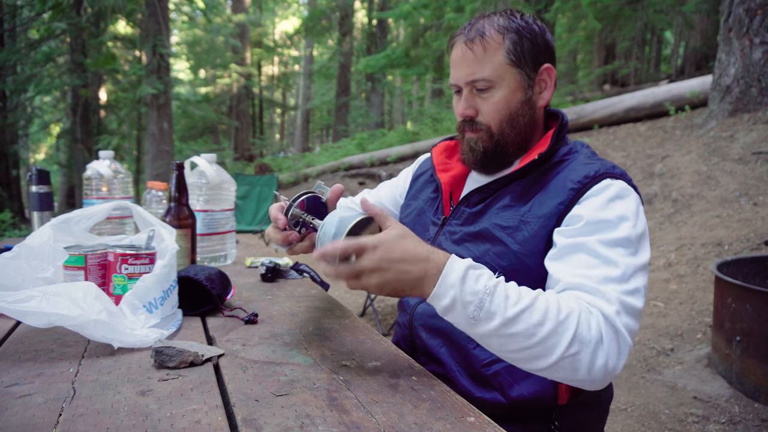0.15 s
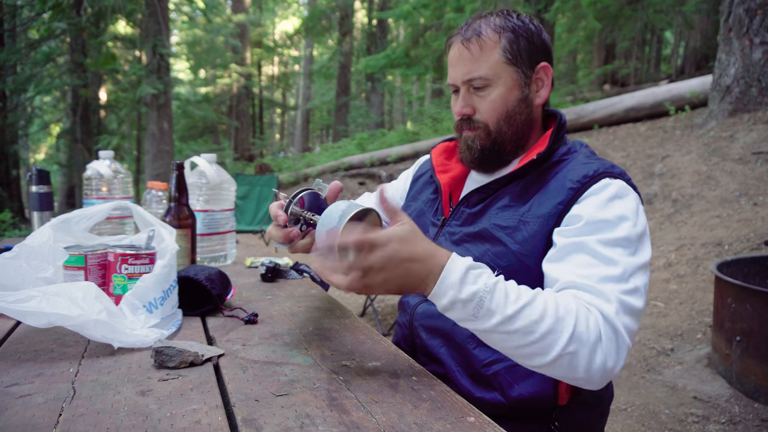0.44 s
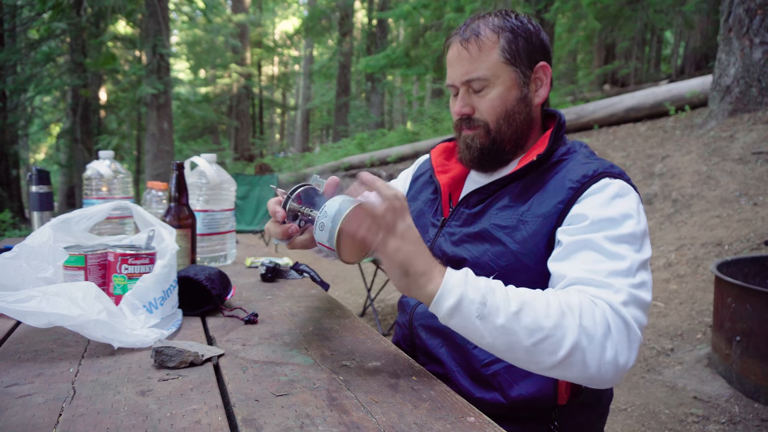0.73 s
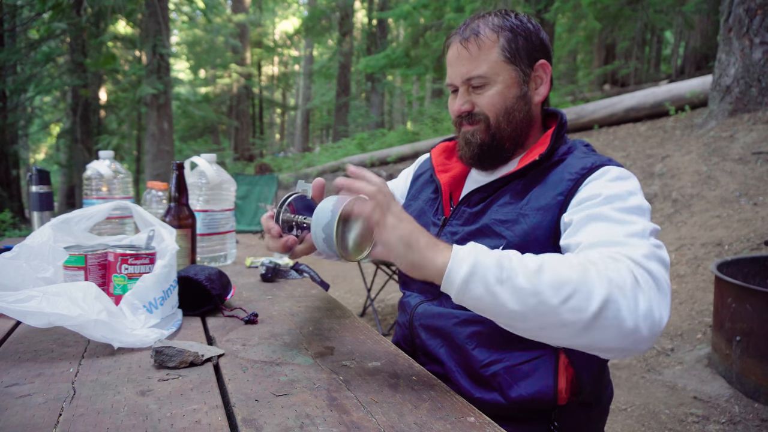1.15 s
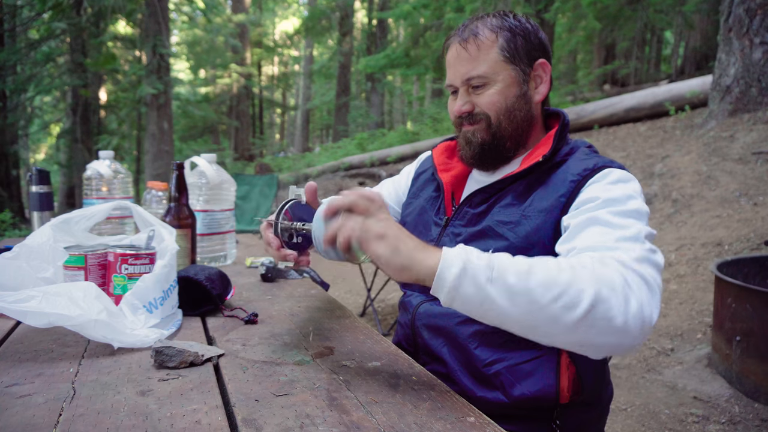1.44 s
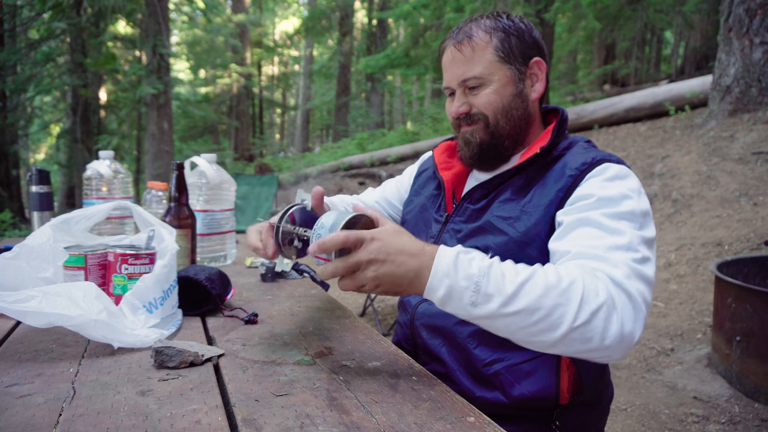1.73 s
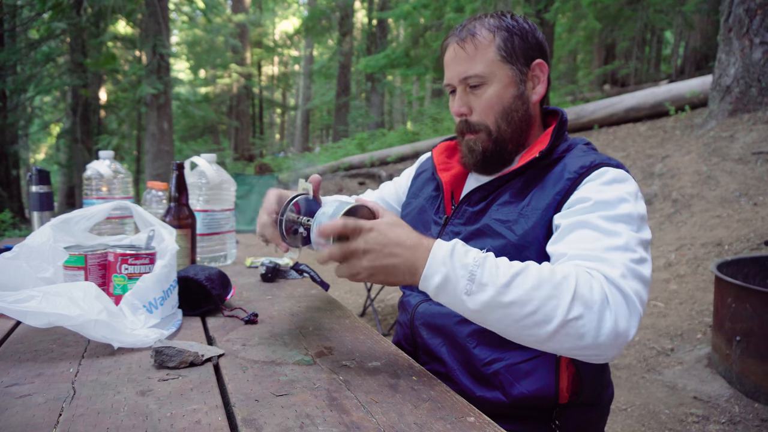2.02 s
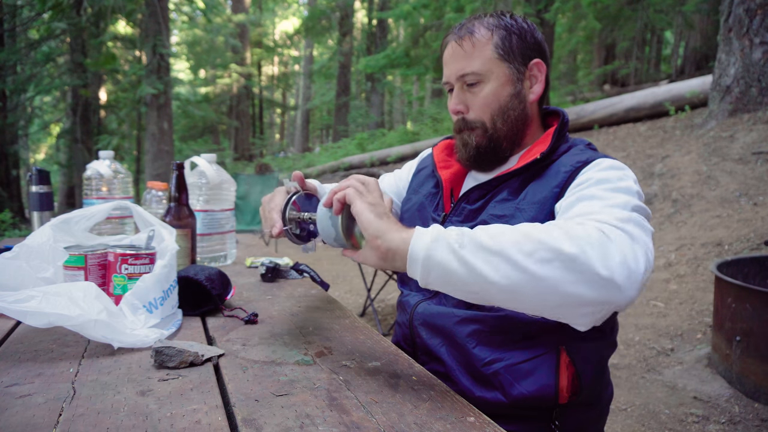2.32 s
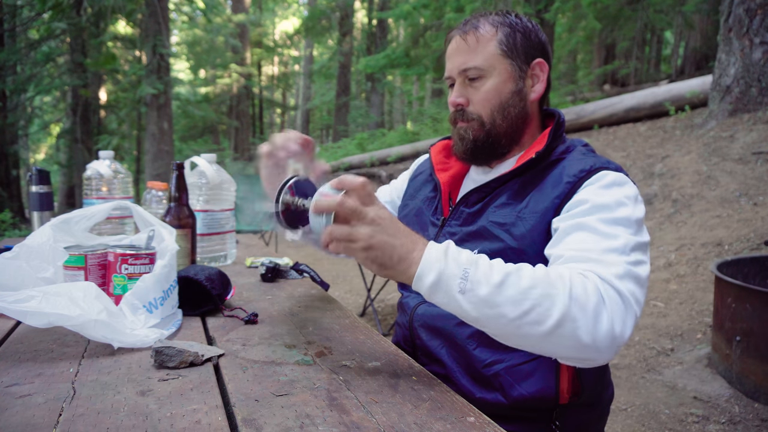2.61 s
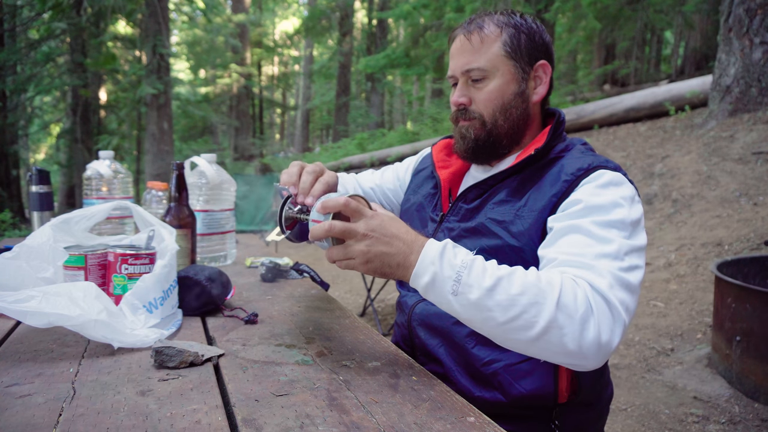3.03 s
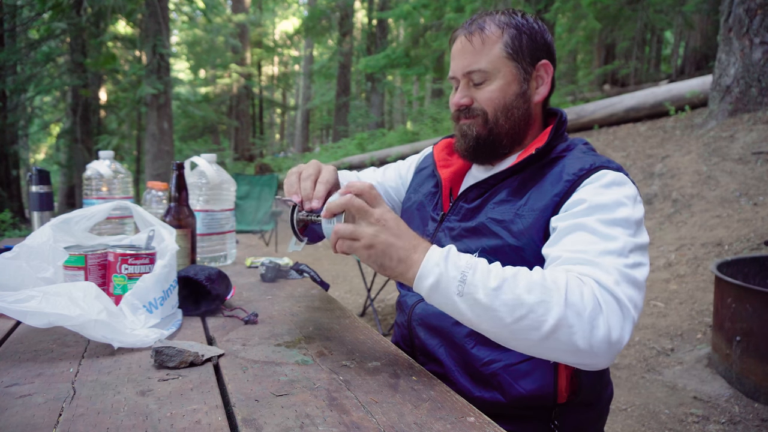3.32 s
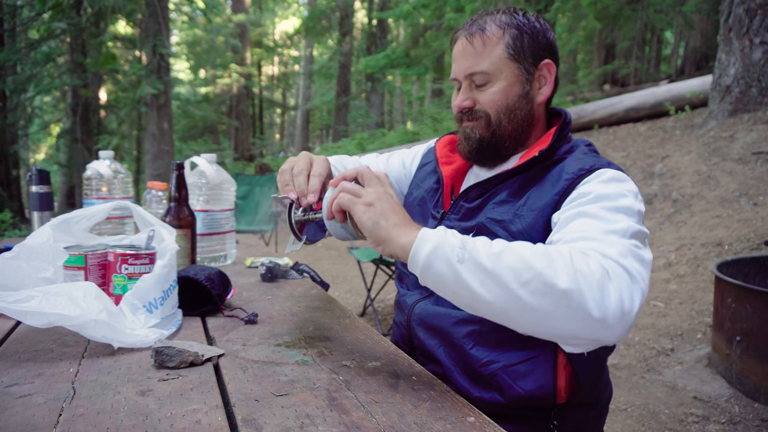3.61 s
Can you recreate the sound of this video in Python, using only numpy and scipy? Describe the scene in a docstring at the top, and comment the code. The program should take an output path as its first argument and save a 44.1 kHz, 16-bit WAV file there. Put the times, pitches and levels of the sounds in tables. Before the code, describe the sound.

Gas hiss from a camping stove canister, close and dry outdoors. At first near quiet: a soft dull knock at 0.04 s, faint ticks until 0.16, a thin high whistle and tiny puffs. At about 0.73 s a loud, bright, rough hiss bursts out, its breathy edge sagging and rising until 1.5. It sputters with shifting hollow colours, thins from 3.15, and catches again at 3.6. Faint distant low rumble underneath.

```python
"""Camping stove at a forest table

A gas canister is screwed onto the stove close by: a knock, ticks, a thin whistle and small puffs come first.
Then the valve opens and noise rushes out in four bands with a rough edge tone, sputtering, coloured by
moving resonances, hollows and close reflections. The jet thins near the end and catches again.
Noise shaped to a distant low rumble, with a wavering hum and faint air, lies underneath in both channels.
"""
import sys
import numpy as np
from scipy import signal
from scipy.fft import rfft, irfft
from scipy.io import wavfile
from scipy.ndimage import uniform_filter1d, map_coordinates

SR = 44100
rng = np.random.default_rng(int(sys.argv[2]) if len(sys.argv) > 2 else 0)


def to_wav(s):
    """Save 16-bit WAV."""
    ch = np.atleast_2d(s).T  # columns
    pcm = np.round(np.clip(ch, -1, 1) * 32767)  # PCM
    wavfile.write(sys.argv[1], SR, pcm.astype(np.int16))


N = 165375
T = np.arange(N) / SR  # seconds
HZ = np.maximum(np.arange(N // 2 + 1) * SR / N, 1)  # frequency axis, kept above zero for logarithms
CUTOFF_HZ = 15800

# Base level of the rushing gas in four bands.
# Each row: time in seconds, then low, middle, high and top band in dB.
HISS_LEVELS = [(0.7, -85, -81, -70, -71), (0.73, -50, -42, -45.5, -37), (0.785, -42, -38, -36, -28),
               (0.8, -37, -33.5, -28, -26), (0.83, -32.5, -33, -25.5, -29.5), (0.97, -34, -35.5, -29, -23),
               (1.04, -27.5, -30.5, -22, -32), (1.06, -26, -30.5, -24, -30.5),
               (1.15, -26.5, -34, -29.5, -36.5), (1.17, -27, -31, -28, -35), (1.37, -29, -31, -24, -30),
               (1.43, -31.5, -29, -25.5, -33), (1.68, -33.5, -31.5, -26, -34.5),
               (2.1, -31, -28.5, -25.5, -35), (2.19, -32.5, -28, -26, -37.5),
               (2.78, -31.5, -24.5, -25, -33), (2.81, -28, -24.5, -24, -36), (2.86, -33, -24.5, -27, -34),
               (3.1, -31.5, -26, -27.5, -33), (3.16, -38, -26, -29, -35.5),
               (3.24, -40.5, -31, -31.5, -36.5), (3.35, -42.5, -34, -32.5, -36.5),
               (3.39, -46.5, -39.5, -35.5, -36), (3.46, -47.5, -41, -37, -34), (3.59, -47, -38.5, -35, -33),
               (3.6, -41, -29.5, -29, -37.5), (3.73, -41, -30.5, -31, -37.5), (3.75, -40, -36, -33, -35)]
# Borders between those bands in Hz, and a constant trim for each band in dB.
BAND_EDGES_HZ = [3500, 5500, 10500]
BAND_TRIM_DB = [0.028, -0.53, -1.3, -0.12]
FLUTTER_DB, FLUTTER_HZ = 0.21, 98  # spread and speed, drawn separately for each band

# Smooth colour of the jet. Each row: frequency in Hz, gain in dB.
JET_COLOUR = [(50, -58), (200, -17.5), (350, -18.5), (600, -24), (1100, -20.5), (1450, -8.5), (2400, -2.5),
              (3500, -4), (5000, -5), (7500, 1.9), (10000, -1.5), (12000, -0.9), (15800, 0.7)]
SPUTTER_DB, SPUTTER_HZ = 0.6, 37
# Droplets of liquid gas burst in the jet: mean rate, swell at strength 1, time from start to peak.
SPITS_PER_S, SPIT_DB, SPIT_RISE_S = 75, -9, 0.00058

# Place of the stove in the stereo picture. Each row: frequency in Hz, left minus right in dB.
PAN = [(900, -0.5), (1200, 4), (1500, 0.5), (2800, -0.8), (4300, 3), (5400, 5), (7000, 2.5), (10000, 2),
       (15000, -1.5)]
RIGHT_LAG_S = 0.000008
# Part of the hiss unrelated between the channels. Each row: frequency in Hz, level against the shared part in dB.
SCATTER = [(250, -26), (900, -19.5), (1150, -4), (1550, -15.5), (2700, -16.5), (3500, -4.5), (4500, -9),
           (5700, -2.5), (7300, -9), (14000, -7)]

# Resonances and hollows of the burner. Each row: frequency in Hz, width in Hz, mean gain in dB.
BURNER = [(924, 103, 7), (2114, 310, 2.5), (2810, 47, -0.4), (3500, 310, -5), (5030, 186, 1.2),
          (6100, 370, -1.5), (6330, 240, 3.5), (7030, 180, 4.0), (7780, 940, 3.5), (9860, 350, 4.5),
          (11090, 210, 4.5), (13000, 370, 2.5)]
SWELL_DB, SWELL_HZ = 1.5, 2.5
# The two strongest cavity tones move as the hands turn the canister.
# Each row: time in seconds, frequency in Hz.
LOW_CAVITY = [(0.8, 1600), (1.37, 1605), (1.55, 1715), (2.15, 1735), (2.85, 1710), (2.95, 1640),
              (3.4, 1590), (3.75, 1600)]
MAIN_CAVITY = [(0.8, 4380), (1.37, 4320), (1.55, 4540), (2.2, 4570), (2.4, 4470), (2.75, 4380), (3.0, 4490),
               (3.3, 4550), (3.75, 4600)]
LOW_WIDTH_HZ, LOW_ADDED_DB = 57, 11
MAIN_WIDTH_HZ, MAIN_START_DB, MAIN_END_DB = 260, -5.5, 14
# Resonances and hollows that come and go with the grip. Each row: start and end in seconds,
# frequency at start and at end in Hz, width in Hz, gain in dB (negative for a hollow).
GRIP = [(0.6, 0.79, 1500, 1490, 400, -12), (0.77, 1.03, 716, 660, 240, 6.5), (0.8, 0.9, 2160, 2150, 120, 6),
        (0.84, 1.62, 5400, 5200, 260, -5), (0.948, 1.204, 3050, 3070, 700, 4.5),
        (1.02, 1.678, 2230, 2120, 110, 6.5), (1.07, 1.42, 13800, 13800, 1000, -9),
        (1.2, 2.0, 5950, 5950, 200, -1), (1.28, 2.282, 1520, 1620, 80, 2.5),
        (1.253, 1.82, 3300, 3400, 350, -4), (1.45, 1.94, 6540, 6560, 150, 5),
        (1.45, 2.05, 8650, 8600, 400, -2), (1.48, 1.7, 9850, 9700, 400, 7),
        (1.5, 2.5, 12300, 12000, 900, -5), (1.8, 2.15, 4580, 4600, 100, 4),
        (1.45, 2.5, 13200, 13350, 300, 4), (1.48, 2.41, 5710, 5500, 150, 3.5),
        (1.76, 1.97, 1440, 1480, 180, -8), (1.82, 1.95, 8100, 8000, 300, 6),
        (1.917, 2.6, 9140, 9200, 250, 5), (1.96, 2.92, 1200, 1170, 140, 5.5),
        (1.97, 2.492, 6120, 6400, 460, -9.5), (1.98, 3.03, 5560, 5450, 360, -4.5),
        (2.24, 2.42, 3500, 3550, 200, -11), (2.29, 2.695, 2500, 2410, 110, 8),
        (2.52, 2.9, 5860, 6000, 200, 4.5), (2.56, 2.8, 3180, 3130, 250, -6),
        (2.55, 2.74, 10700, 10700, 400, -5), (2.555, 2.9, 3700, 4100, 300, 5.5),
        (2.68, 2.88, 8550, 8700, 300, 5.5), (2.8, 3.2, 910, 930, 150, 3.5),
        (2.86, 3.03, 5500, 5540, 140, 9), (2.9, 3.2, 8360, 8550, 300, -4),
        (2.97, 3.95, 1790, 1810, 80, -21), (3.02, 3.47, 6900, 6600, 330, 5.5),
        (3.123, 3.53, 1540, 1470, 100, 6.5), (3.16, 3.63, 12370, 12910, 780, -8),
        (3.18, 4, 5180, 5150, 170, 6.5), (3.27, 4, 3280, 3260, 90, 3), (3.38, 3.62, 3550, 3570, 310, -24),
        (3.25, 4, 3530, 3530, 110, -14), (3.35, 3.56, 2520, 2520, 200, -7),
        (3.3, 3.52, 10300, 10350, 400, -6), (3.38, 3.87, 6180, 5700, 700, -15),
        (3.354, 3.56, 7300, 7350, 300, -13), (3.3, 3.8, 8950, 9300, 300, -6.5),
        (3.498, 3.8, 9900, 9600, 300, 3.5), (3.57, 4, 2340, 2260, 80, 8)]
GRIP_FADE_S = 0.039

# Close reflections from hands, canister, chest and table.
# Each row: mean delay behind the direct sound in seconds, mean level in dB.
REFLECTIONS = [(0.000616, -20), (0.00105, -20), (0.00137, -18), (0.0018, -16), (0.0024, -16), (0.0034, -17),
               (0.0047, -18), (0.0073, -20)]
SWAY_S, SWAY_HZ = 0.00002, 0.8
REFLECTION_FLICKER = 0.47  # share by which each reflection comes and goes
# A hand passing over the burner. Each row: time in seconds, delay of its reflection in seconds, level in dB.
HAND = [(2.1, 0.00043, -40), (2.52, 0.00046, -17), (2.6, 0.000494, -7.5), (2.72, 0.000488, -7),
        (2.85, 0.000455, -9.5), (3.0, 0.000423, -18), (3.15, 0.00042, -40)]
# Short spurts of gas. Each row: centre in seconds, length in seconds, peak gain in dB.
SPURTS = [(1.884, 0.0088, 3), (3.147, 0.02, 1.5)]

# Breathy edge tone at the valve.
# Each row: time in seconds, frequency in Hz, level before sputter and spurts in dB.
EDGE_TONE = [(0.73, 8900, -56), (0.8, 8500, -28.5), (0.9, 8200, -32.5), (1.02, 7700, -25.5),
             (1.12, 7340, -23), (1.21, 6920, -22.5), (1.26, 7900, -27), (1.38, 8650, -29.5),
             (1.5, 8200, -51)]
EDGE_PASS_WIDTH_HZ = 840  # of each of two passes

# First leaks. Each row: centre in seconds, length in seconds, level in dB, frequency in Hz, width in Hz.
LEAKS = [(0.33, 0.035, -70, 2050, 220), (0.342, 0.03, -65.5, 5200, 900), (0.37, 0.07, -67, 8000, 6000),
         (0.392, 0.016, -63.5, 8500, 7000), (0.5, 0.25, -71.5, 2140, 220),
         (0.617, 0.011, -65.5, 9000, 7000), (0.685, 0.032, -61, 11000, 6000)]
LEAK_GRAIN_DB, LEAK_GRAIN_HZ = 4.5, 280
# Thin whistle at the seal. Each row: time in seconds, level in dB.
WHISTLE = [(0, -98), (0.08, -79), (0.18, -73), (0.31, -71), (0.37, -76), (0.46, -71), (0.505, -84),
           (0.57, -70.5), (0.66, -79), (0.76, -90)]
WHISTLE_HZ, WHISTLE_OCTAVE_DB, WHISTLE_WAVER_HZ = 4091, -9, 7

# Ticks of the thread. Each row: start in seconds, starting level in dB, decay in seconds.
TICKS = [(0.068, -72, 0.025), (0.157, -65, 0.004)]
TICK_HZ, TICK_WIDTH_HZ = 5700, 600
# Soft knock of handling. Each row: start in seconds, approximate peak in dB.
KNOCKS = [(0.0418, -36.5)]
KNOCK_HZ, KNOCK_DECAY_PER_S = 210, 800

# Colour of the forest. Each row: frequency in Hz, gain in dB.
FOREST = [(25, -14.5), (45, -28), (65, -0.5), (110, -0.5), (155, 0), (180, -8), (300, -12.5), (430, -25),
          (600, -31), (1500, -36.5), (3500, -42), (6000, -44), (9000, -48.5), (16000, -58)]
# Stereo spread of the forest. Each row: frequency in Hz, side against middle in dB.
FOREST_SIDE = [(30, -42), (100, -43), (200, -29), (380, -13.5), (700, -5.5), (1300, 0), (8000, 0),
               (15000, -7)]
FOREST_DB, HUM_HZ, HUM_DB = -49.5, 78.7, -59


def jet(flow):
    """Turbulent gas passes the burner, reflections and hand; each band then gets its own level."""
    gas = shaped(turbulence() * flow, from_db(over_hz(JET_COLOUR)))
    gas = hand(reflections(burner(gas)))
    lowpasses = [1 / (1 + (HZ / hz) ** 20) for hz in BAND_EDGES_HZ]
    below = [0] + lowpasses + [1 * (HZ < CUTOFF_HZ)]
    out = 0
    for low, high, db, trim_db in zip(below, below[1:], in_time(HISS_LEVELS), BAND_TRIM_DB):
        band = shaped(gas, high - low)
        # even out the slow level over 0.15 s, then set it
        power = uniform_filter1d(np.mean(band, axis=0) ** 2, size=6615)
        band = band / np.sqrt(power)
        flutter_db = FLUTTER_DB * drift(FLUTTER_HZ)
        out = out + band * from_db(db + trim_db + flutter_db)
    valve_open = T > HISS_LEVELS[0][0]
    return out * valve_open


def sputter():
    """Gain of the unsteady jet: flow wobble plus short spits that swell and die."""
    strength = np.minimum(rng.exponential(1, N), 2)
    spits = (rng.random(N) < SPITS_PER_S / SR) * strength
    r = np.exp(-1 / (SPIT_RISE_S * SR))
    bursts = signal.lfilter([np.e * (1 - r)], [1, -2 * r, r * r], spits)  # peak 1 for strength 1
    wobble = from_db(SPUTTER_DB * drift(SPUTTER_HZ))
    return rms_one(wobble * (1 + from_db(SPIT_DB) * bursts))


def turbulence():
    """Stereo noise from the stove: a part shared by both channels and a scattered part, placed by PAN and lag."""
    direct = rfft(rng.standard_normal(N))
    scattered = rfft(rng.standard_normal((2, N))) * from_db(over_hz(SCATTER))
    side = np.array([[1], [-1]]) / 2  # left, right
    lag = np.exp(2j * np.pi * HZ * RIGHT_LAG_S * side)
    place = from_db(side * over_hz(PAN)) * lag
    return irfft((direct + scattered) * place, N)


def burner(gas):
    """The burner's resonances swell and fade, two cavity tones move, and the grip adds gliding peaks and hollows."""
    for hz, width, db in BURNER:
        gain = from_db(db + SWELL_DB * drift(SWELL_HZ))
        gas = gas + (gain - 1) * resonate(gas, hz, width)
    low_hz, main_hz = in_time(LOW_CAVITY)[0], in_time(MAIN_CAVITY)[0]
    gas = gas + from_db(LOW_ADDED_DB) * resonate(gas, low_hz, LOW_WIDTH_HZ)
    main_db = np.linspace(MAIN_START_DB, MAIN_END_DB, N)
    gas = gas + from_db(main_db) * resonate(gas, main_hz, MAIN_WIDTH_HZ)
    for start, end, start_hz, end_hz, width, db in GRIP:
        held = np.clip(np.minimum(T - start, end - T) / GRIP_FADE_S + .5, 0, 1)
        hz = np.interp(T, [start, end], [start_hz, end_hz])
        gas = gas + (from_db(db * held) - 1) * resonate(gas, hz, width)
    return gas


def reflections(x):
    """Several short, unrelated paths cut irregular, slowly drifting ripples into the hiss."""
    out = x
    for delay_s, db in REFLECTIONS:
        swaying_s = delay_s + SWAY_S * drift(SWAY_HZ)
        gain = from_db(db) * (1 + REFLECTION_FLICKER * drift(SWAY_HZ))
        out = out + gain * delayed(x, swaying_s)
    return out


def hand(x):
    """The cupped hand sends back one strong reflection: a comb that slides as the hand comes and goes."""
    delay_s, db = in_time(HAND)
    return x + from_db(db) * delayed(x, delay_s)


def spurts():
    """Gain of the hiss while a spurt of gas passes, rising and falling as a bell curve in dB."""
    return from_db(sum(db * bell(s, length) for s, length, db in SPURTS))


def edge_tone():
    """A rough, narrow band of hiss at the valve whose pitch sags, then climbs back."""
    hz, db = in_time(EDGE_TONE)
    tone = resonate(turbulence(), hz, EDGE_PASS_WIDTH_HZ)
    tone = resonate(tone, hz, EDGE_PASS_WIDTH_HZ)
    sounding = (T > EDGE_TONE[0][0]) * (T < EDGE_TONE[-1][0])
    return rms_one(tone) * from_db(db) * sounding


def seal():
    """Grainy puffs of filtered noise and a thin two-partial whistle of escaping gas at the seal."""
    air = turbulence() * from_db(LEAK_GRAIN_DB * drift(LEAK_GRAIN_HZ))
    leaks = 0
    for s, length, db, hz, width in LEAKS:
        puff = rms_one(resonate(air, hz, width))
        leaks = leaks + puff * from_db(db) * bell(s, length)
    pitch_hz = WHISTLE_HZ + WHISTLE_WAVER_HZ * drift(40)
    phase = 2 * np.pi * np.cumsum(pitch_hz) / SR
    whistle = rms_one(np.sin(phase) + from_db(WHISTLE_OCTAVE_DB) * np.sin(2 * phase))
    level = from_db(in_time(WHISTLE)[0]) * (T < WHISTLE[-1][0])
    return leaks + whistle * level


def thread():
    """The metal thread ticks as the canister turns: resonant noise with sudden starts and exponential decays."""
    rasp = rms_one(resonate(turbulence(), TICK_HZ, TICK_WIDTH_HZ))
    envelope = 0
    for s, db, decay_s in TICKS:
        envelope = envelope + from_db(db) * (T > s) * np.exp(-np.abs(T - s) / decay_s)
    return rasp * envelope


def knocks():
    """A dull bump of the hand on the canister, as a heavily damped sine."""
    out = np.zeros(N)
    for s, db in KNOCKS:
        age = np.maximum(T - s, 0)
        ring = np.sin(2 * np.pi * KNOCK_HZ * age) * np.exp(-KNOCK_DECAY_PER_S * age)
        out -= 2 * from_db(db) * ring  # doubled because damping about halves the first peak
    return out


def forest():
    """Distant rumble and faint air from shaped noise, wider in the treble, with a wavering hum in the middle."""
    mid, side = shaped(rng.standard_normal((2, N)), from_db(over_hz(FOREST)))
    side = shaped(side, from_db(over_hz(FOREST_SIDE)))
    air = rms_one(mid + side * np.array([[1], [-1]]))
    hum_hz = HUM_HZ + 2 * drift(4.86)
    hum = rms_one(np.sin(2 * np.pi * np.cumsum(hum_hz) / SR))
    return from_db(FOREST_DB) * air + from_db(HUM_DB) * hum


def resonate(x, hz, width_hz, size=441):
    """A two-pole resonance of gain 1 at hz; a curve of hz is followed in blocks of size samples."""
    r = np.exp(-np.pi * width_hz / SR)
    zeros = np.array([1, 0, -1]) * (1 - r * r) / 2
    pull = (1 + r * r) * np.cos(2 * np.pi * hz / SR)
    if np.ndim(hz) == 0:
        return signal.lfilter(zeros, [1, -pull, r * r], x)
    out, state = np.zeros_like(x), np.zeros(x.shape[:-1] + (2,))
    for i in range(0, N, size):
        block = x[..., i:i + size]
        out[..., i:i + size], state = signal.lfilter(zeros, [1, -pull[i], r * r], block, zi=state)
    return out


def delayed(x, delay_s):
    """Both channels heard later by a delay that may move, read between samples."""
    position = (T - delay_s) * SR
    return np.array([map_coordinates(channel, [position], order=3) for channel in x])


def bell(centre_s, length_s):
    """Bell curve with peak 1, down to 0.61 half a length from its centre."""
    return np.exp(-2 * ((T - centre_s) / length_s) ** 2)


def drift(rate_hz):
    """Random wander of spread 1, from noise whose amplitude is halved at rate_hz."""
    return rms_one(shaped(rng.standard_normal(N), 1 / (1 + (HZ / rate_hz) ** 2)))


def shaped(x, gain):
    """Filter by a gain for each frequency."""
    return irfft(rfft(x) * gain, N)


def over_hz(points):
    """A spectrum table on the full frequency axis, straight over log frequency."""
    hz, value = np.transpose(points)
    return np.interp(np.log(HZ), np.log(hz), value)


def in_time(rows):
    """Each column after the time column, sample by sample."""
    s, *columns = np.transpose(rows)
    return [np.interp(T, s, column) for column in columns]


def rms_one(x):
    """Scale to unit RMS level."""
    return x / np.sqrt(np.mean(x ** 2) + 1e-20)


def from_db(db):
    """Decibels to amplitude gain."""
    return 10 ** (np.asarray(db) / 20)


def scene():
    """The stove in front of the forest; jet and edge tone share one sputtering flow."""
    flow = sputter()
    rush = (jet(flow) + edge_tone() * flow) * spurts()
    return rush + seal() + thread() + knocks() + forest()


def record(dry):
    """A steep elliptic low-pass cuts the top."""
    steep = signal.ellip(12, 0.1, 80, CUTOFF_HZ, fs=SR, output="sos")
    return signal.sosfilt(steep, dry)


dry = scene()
out = record(dry)
to_wav(out)
```